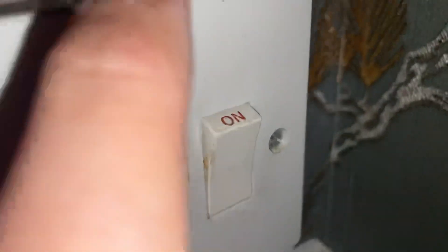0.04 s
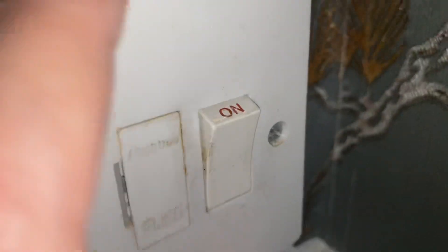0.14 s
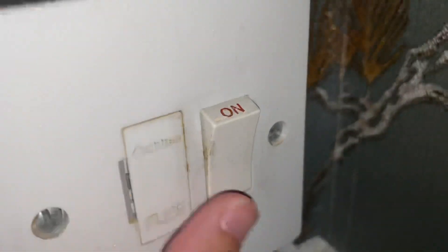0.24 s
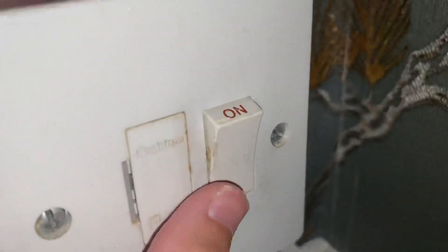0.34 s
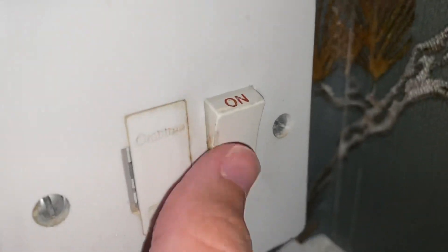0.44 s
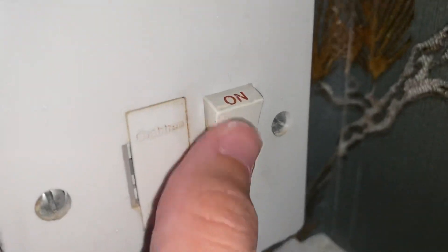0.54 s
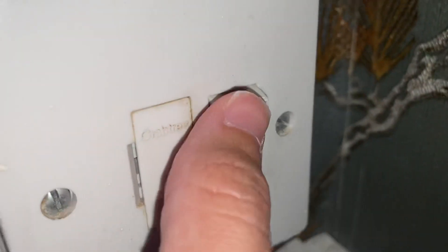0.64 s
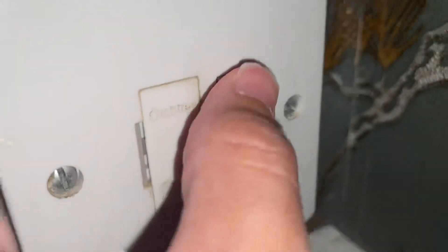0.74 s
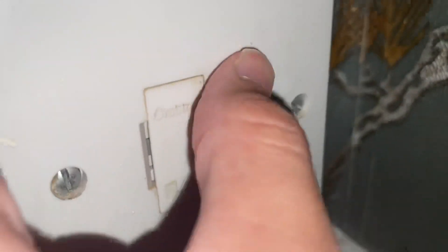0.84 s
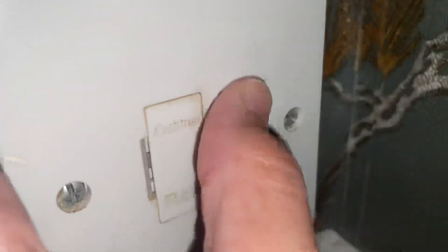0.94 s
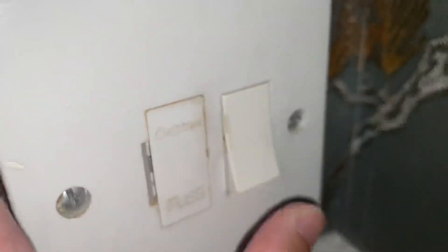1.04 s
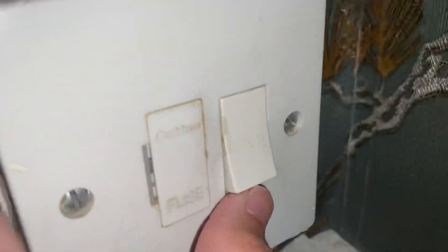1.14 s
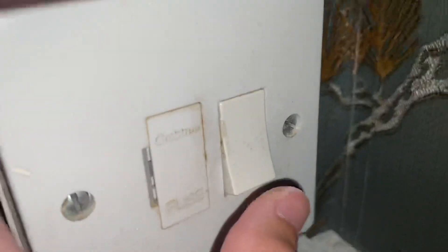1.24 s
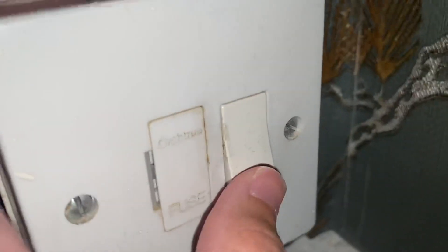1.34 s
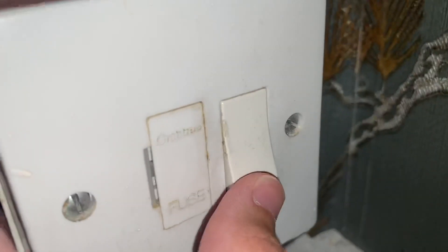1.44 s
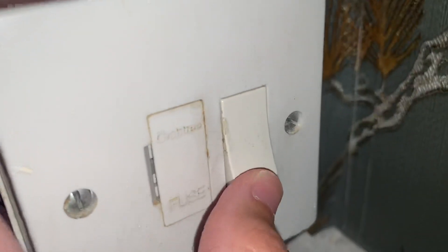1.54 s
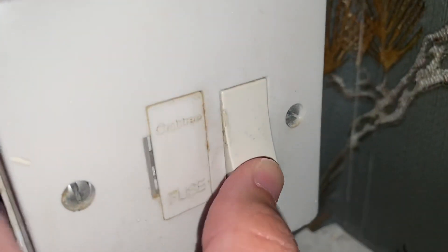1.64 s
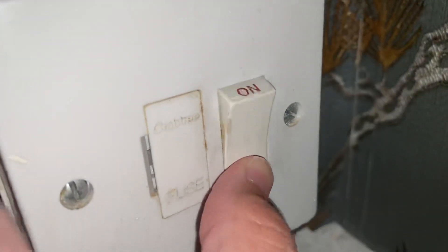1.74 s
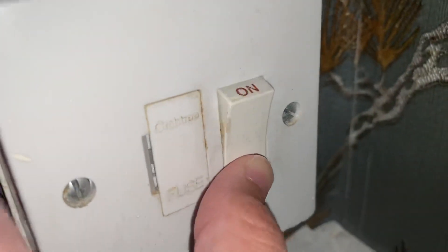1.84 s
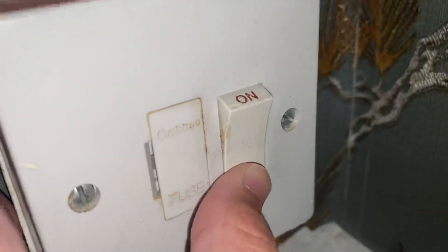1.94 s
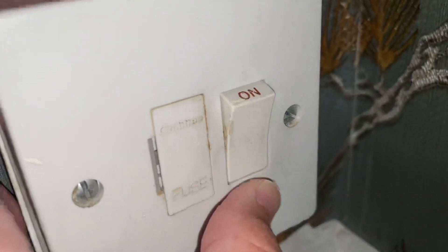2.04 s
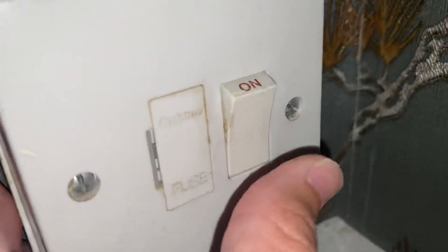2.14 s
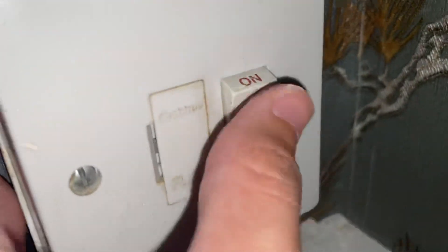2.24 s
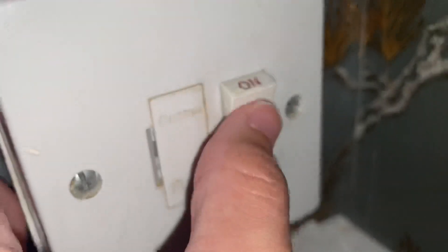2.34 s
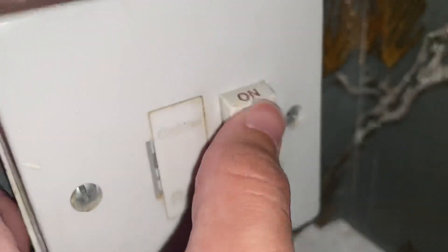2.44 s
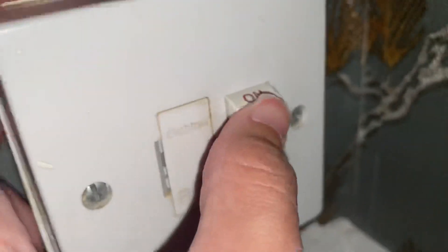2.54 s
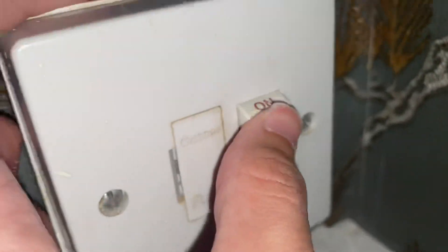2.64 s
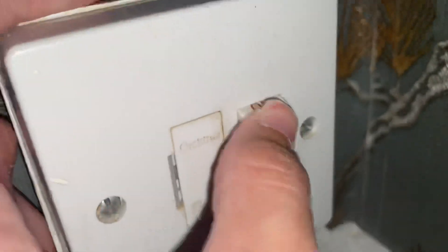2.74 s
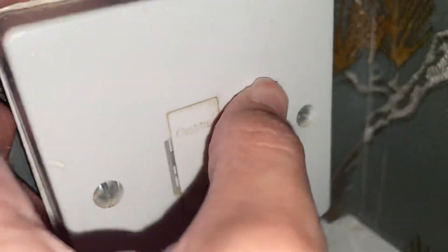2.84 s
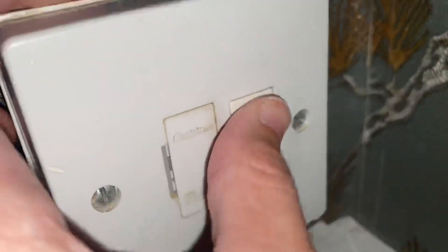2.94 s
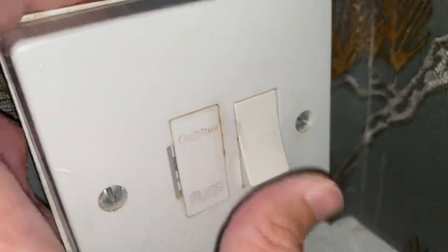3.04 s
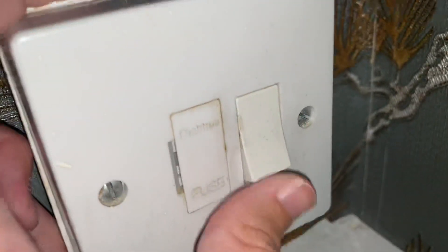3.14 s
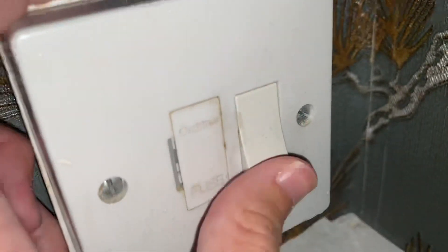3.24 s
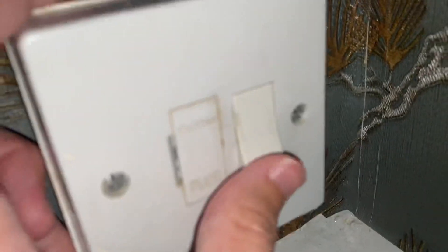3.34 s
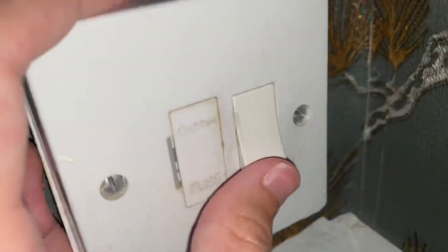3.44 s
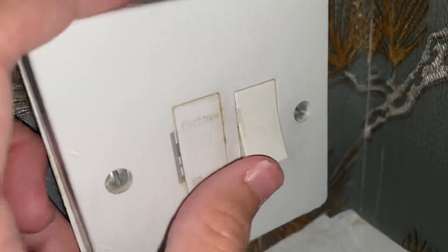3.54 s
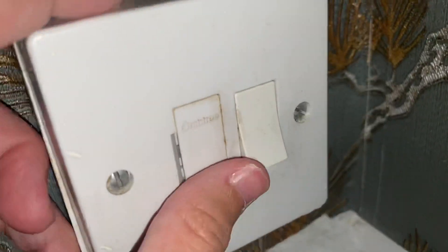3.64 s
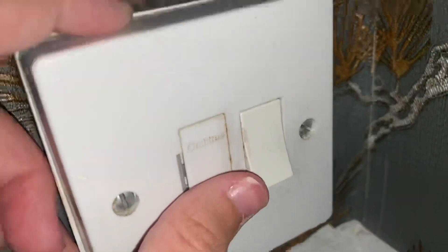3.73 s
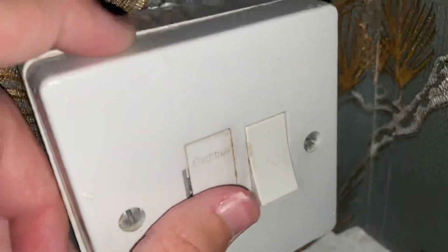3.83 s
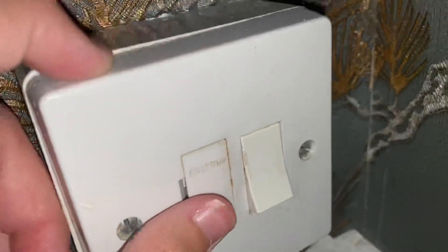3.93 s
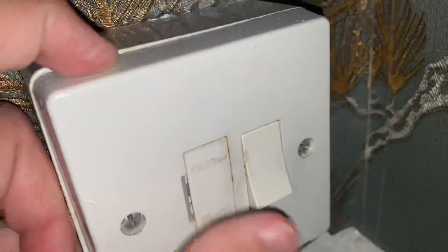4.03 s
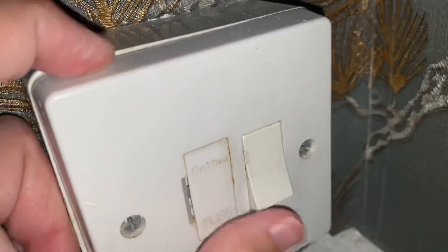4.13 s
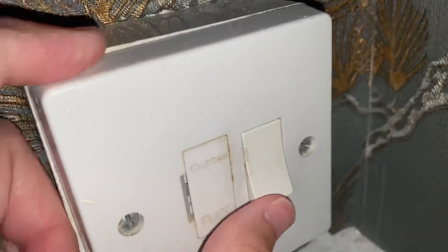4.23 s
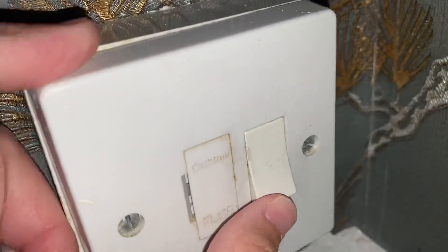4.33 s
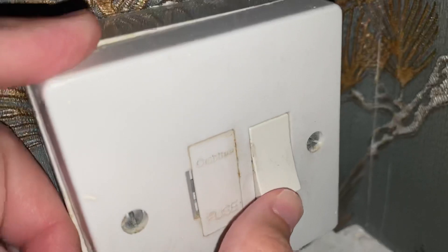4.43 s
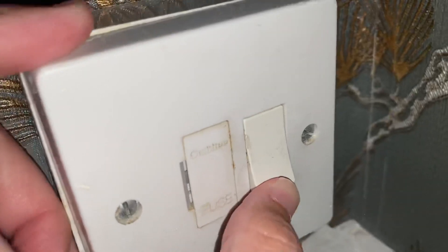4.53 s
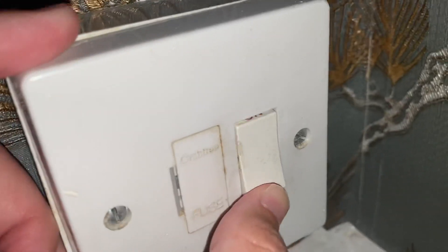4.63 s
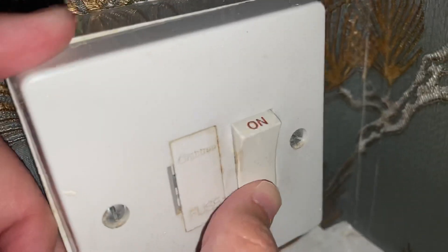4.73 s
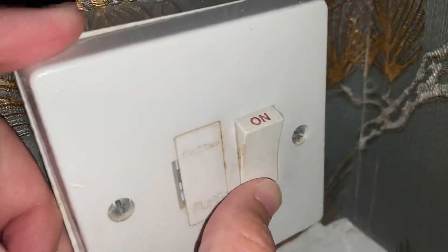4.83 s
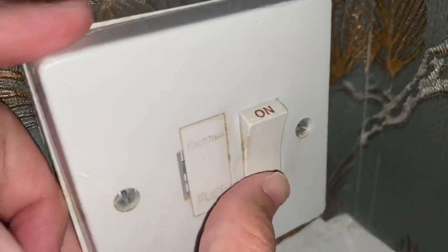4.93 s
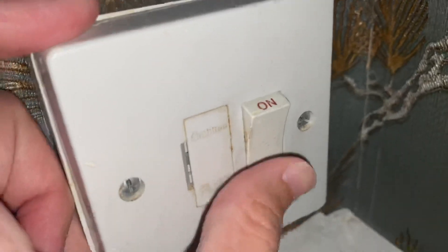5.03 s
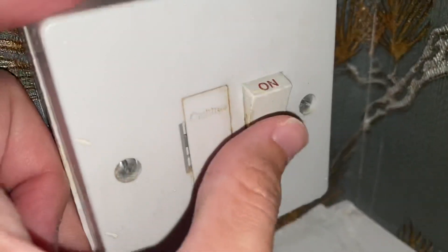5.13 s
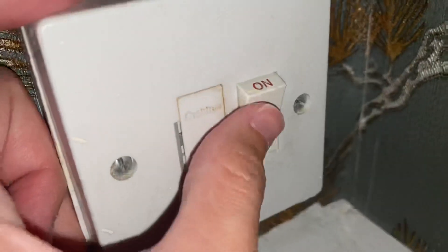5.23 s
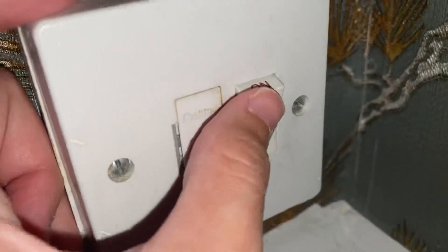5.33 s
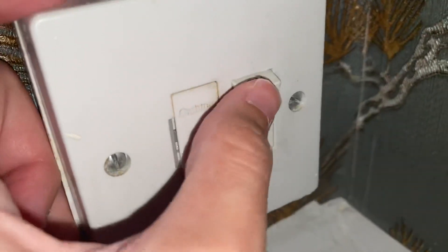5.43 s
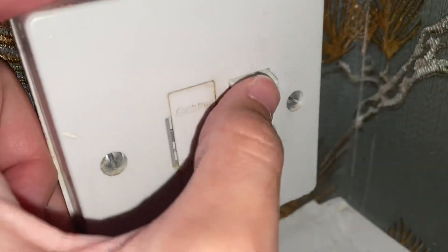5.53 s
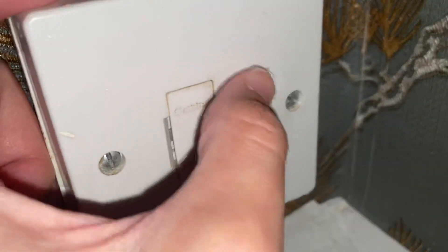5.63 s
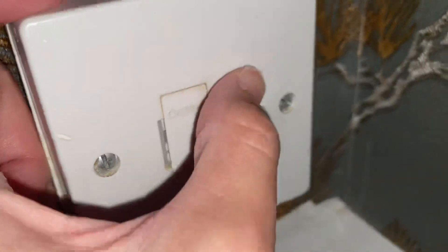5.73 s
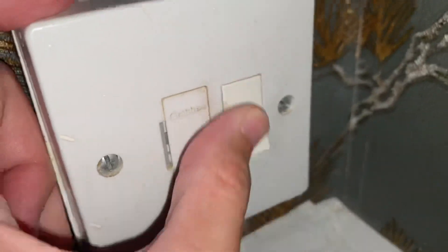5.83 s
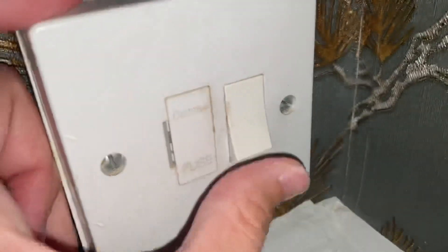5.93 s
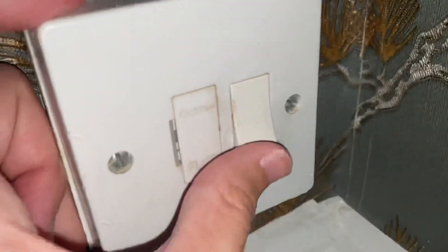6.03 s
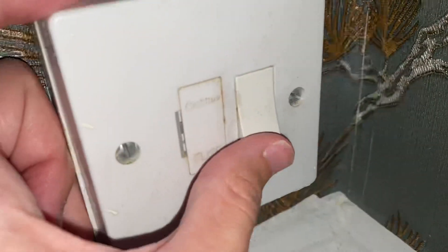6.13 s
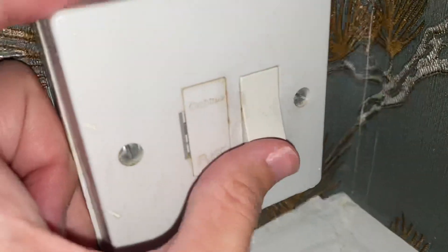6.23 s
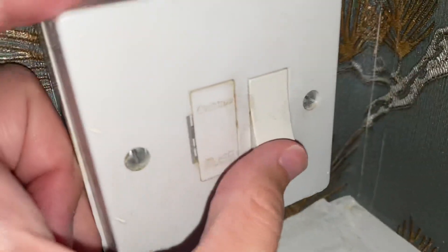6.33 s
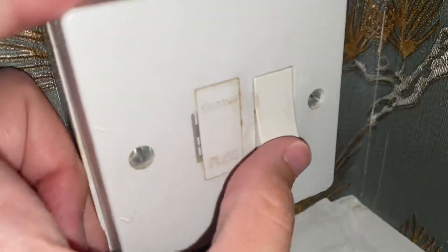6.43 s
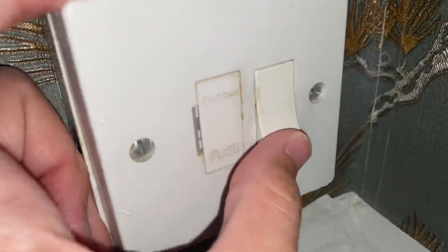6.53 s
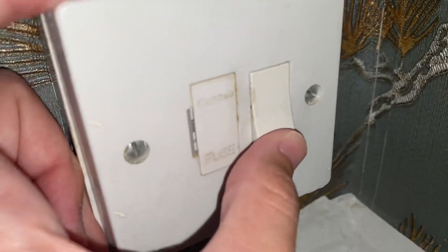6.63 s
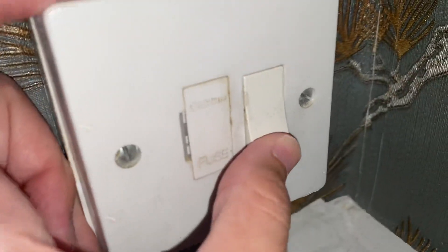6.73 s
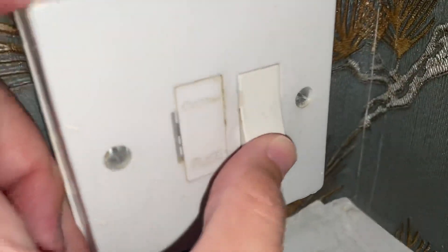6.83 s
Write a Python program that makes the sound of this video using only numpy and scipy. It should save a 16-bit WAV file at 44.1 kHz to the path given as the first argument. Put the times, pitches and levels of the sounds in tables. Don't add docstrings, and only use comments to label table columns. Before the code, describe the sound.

Five hard, bright plastic switch snaps, unevenly spaced over seven seconds, very close, with finger rustles, small ticks and faint hum in a room.

```python
import sys
import numpy as np
from scipy import signal
from scipy.fft import rfft, irfft, next_fast_len
from scipy.io import wavfile
from scipy.ndimage import uniform_filter1d, map_coordinates

SR = 44100
rng = np.random.default_rng(int(sys.argv[2]) if len(sys.argv) > 2 else 0)


def boost_factor(decibels):
    exponent = np.asarray(decibels, float) / 20
    return 10 ** exponent


def int16_out(signal):
    q = np.round(np.clip(np.atleast_2d(signal).T, -1, 1) * 32767)
    wavfile.write(sys.argv[1], SR, q.astype(np.int16))


N = 302967
TIME_S = np.arange(N) / SR


def unit(x):
    return x / np.sqrt(np.mean(x ** 2) + 1e-20)


def along(points, hz):
    f, v = np.transpose(points)
    return np.interp(np.log(hz + 1), np.log(f + 1), v)


def curve(points):
    s, v = np.transpose(points)
    return np.interp(TIME_S, s, v)


def wobble(rate_hz):
    knots = rng.standard_normal(int(N * rate_hz / SR) + 4)
    return map_coordinates(knots, [np.arange(N) * rate_hz / SR])


def filtered(x, response):
    n = x.shape[-1]
    m = next_fast_len(n + 8192)
    return irfft(rfft(x, m) * response(np.fft.rfftfreq(m, 1 / SR)), m)[..., :n]


def modes(table):
    def response(f):
        total = 0
        for k, (c, w, db) in enumerate(table):
            total = total + (-1) ** k * boost_factor(db) * 1j * f * w / (c * c - f * f + 1j * f * w)
        return total
    return response


# f/Hz, correlation
LIKENESS = [(60, 1), (130, 0.77), (290, 0.93), (640, -0.32), (1400, -0.069), (4000, 0.28), (6000, .2)]


def rush(gain, patchy_db, alike=LIKENESS):
    z = signal.stft(rng.standard_normal((2, N)), nperseg=1024)[2]
    field = uniform_filter1d(rng.standard_normal(z.shape[1:]), size=4, axis=0)
    field = uniform_filter1d(field, size=12, axis=1)
    pair = signal.istft(z * boost_factor(patchy_db * unit(field)), nperseg=1024)[1][:, :N]

    def mid_side_gain(hz):
        angle = np.arccos(np.clip(along(alike, hz), -1, 1)) / 2
        return gain(hz) * np.array([np.cos(angle), np.sin(angle)])
    mid, side = filtered(pair, mid_side_gain)
    return unit(np.array([mid + side, mid - side]))


# f/Hz, density/dB per Hz
AIR_SPECTRUM = [(65, -26.5), (110, -1), (147, -19), (248, -23.5), (318, -20.5), (361, -21.5), (780, -30.5),
                (1000, -21.5), (1430, -27.5), (1990, -24.5), (3100, -38), (7250, -57.5), (8740, -63),
                (11000, -58.5), (16000, -75)]


def room_air():
    level_db = -67 + 0.33 * wobble(1.7) + 0.87 * wobble(33)
    return boost_factor(level_db) * rush(lambda f: boost_factor(along(AIR_SPECTRUM, f)), patchy_db=2.5)


# f/Hz, width/Hz, level/dB
HUM_MODES = [(90.57, 17, -0.5), (172.9, 30, -18)]
# t/s, level/dB
HUM_LEVEL = [(0, -60), (.55, -59.5), (.684, -76), (.82, -55), (1.2, -61), (1.7, -59), (2.0, -63),
             (2.42, -69), (2.7, -64), (2.93, -74.5), (3.286, -60.5), (3.66, -65.5), (4.0, -63.5),
             (4.76, -59.5), (5.3, -67), (5.5, -62.5), (5.9, -66), (6.264, -61)]


def mains_hum():
    phase = 2 * np.pi * 99.7 * TIME_S + .8 * wobble(9)
    line = np.sin(phase) + boost_factor(-18.0 + 0.97 * wobble(1.3)) * np.sin(3 * phase)
    buzz = rush(lambda f: modes(HUM_MODES)(f) * (f > 60), patchy_db=-1.26)
    return boost_factor(curve(HUM_LEVEL) + 5.0) * unit(buzz + 2.5 * line)


# f/Hz, width/Hz, level/dB
FAR_BANDS = [(381.1, 100, -80.5), (546, 81, -82.5), (1090, 410, -76), (1916, 280, -83.5), (3730, 600, -89)]
# t/s, length/s, f/Hz, level/dB
FAR_SWELLS = [
    (2.68, 0.082, 413, -68),
    (4.15, 0.11, 943, -67.5),
    (4.55, 0.16, 393.3, -71),
    (5.25, .1, 3410, -80),
    (5.305, 0.056, 1090, -70),
    (5.453, 0.11, 370.3, -73.5),
    (5.996, 0.17, 371.4, -70),
    (6.099, 0.19, 2985, -88),
    (6.584, 0.096, 396, -68.5),
]


def appliance():
    noise = rng.standard_normal((2, N))

    def band(hz, width_hz):
        return unit(filtered(noise, lambda f: modes([(hz, width_hz, 0)])(f) ** 2))
    out = np.zeros((2, N))
    for hz, width_hz, db in FAR_BANDS:
        out += boost_factor(db + 0.72 * wobble(3.3)) * band(hz, width_hz)
    for s, length_s, hz, db in FAR_SWELLS:
        out += boost_factor(db) * np.exp(-((TIME_S - s) / length_s) ** 2) * band(hz, 0.073 * hz)
    return out


# t/s, level/dB
TREMOR = [(0, -61.5), (.5, -49.5), (.582, -43.5), (.726, -38.5), (.88, -44.5), (.955, -62.5),
          (1.126, -60.5), (1.7, -64), (1.9, -65), (2.45, -74), (3.04, -77), (3.286, -54), (3.55, -60),
          (3.68, -81.5), (4.0, -73), (5.03, -61), (5.3, -76.5), (6.87, -70.5)]
# t/s, level/dB
GRIP_PRESSURE = [(0, -57), (.1, -68), (.45, -59.5), (.58, -43), (.66, -55), (.8, -57), (.95, -64.5),
                 (1.2, -63.5), (2.4, -71), (2.77, -66), (3.3, -76), (6.87, -72.5)]


def hand_on_phone():
    rumble = rush(lambda f: modes([(40, 35, 0)])(f) ** 2, patchy_db=.5, alike=[(40, .55)])
    grip = rush(lambda f: modes([(150, 150, 0)])(f) ** 3, patchy_db=3.0, alike=[(150, 0.83)])
    rumble_db = curve(TREMOR) + 1.2 * wobble(9.2)
    grip_db = curve(GRIP_PRESSURE) + 2.5 * wobble(8) + 4.5
    return boost_factor(rumble_db) * rumble + boost_factor(grip_db) * grip


# t/s, f/Hz, peak level/dB, half length/s
GRIP_BUMPS = [
    (0.564, 36.2, -23.5, 0.01),
    (0.609, 37.6, -31, 0.044),
    (0.662, 70, -44, 0.027),
    (0.726, 113.8, -24.5, 0.0081),
    (0.776, 44.95, -37.5, .04),
    (5.048, 55, -46, 0.013),
]


def bumps():
    push = np.zeros(N)
    for s, hz, db, half_s in GRIP_BUMPS:
        t = TIME_S - s
        push += boost_factor(db) * np.exp(-(t / half_s) ** 2) * np.sin(2 * np.pi * hz * t)
    return push * np.c_[[.6, 1.3]]


# t/s, level/dB
PALM_LEVEL = [
    (0.0, -49),
    (0.022, -45.5),
    (0.096, -76),
    (0.196, -72.5),
    (0.4, -54),
    (0.518, -68),
    (0.544, -80),
    (0.62, -90),
]


def palm():
    rustle = rush(lambda f: modes([(440, 170, 0)])(f) ** 2, patchy_db=3.5)
    return boost_factor(curve(PALM_LEVEL + [(.7, -110)]) - 2.0) * rustle


# t/s, fade/s, hiss level/dB, drag level/dB
STROKES = [(.0, 0.043, -49.5, -50.5), (0.203, 0.036, -60, -82), (0.358, 0.14, -66, -65.5),
           (.568, 0.059, -60.5, -66), (0.678, 0.027, -69.5, -67), (0.791, 0.092, -85, -62.5),
           (1.018, 0.051, -50, -55), (1.12, .06, -71, -63.5), (1.3, 0.18, -93, -79.5),
           (2.033, 0.015, -63, -77), (2.55, 0.093, -79, -69), (2.76, .03, -63, -60),
           (3.049, 0.11, -61, -73.5), (3.183, 0.031, -78, -81.5), (3.282, 0.069, -71.5, -72),
           (3.385, 0.026, -87, -74), (3.532, 0.072, -82.5, -65.5), (3.621, 0.08, -68.5, -85),
           (3.76, 0.087, -67.5, -67.5), (3.858, .12, -63.5, -72), (4.041, .07, -68, -73.5),
           (4.14, .04, -77.5, -65.5), (4.64, .05, -75, -82), (4.975, 0.014, -80.5, -66),
           (5.289, 0.031, -74, -79), (5.885, .05, -58.5, -77), (6.192, .045, -80, -88),
           (6.422, .055, -79, -81), (6.736, .018, -85, -74), (6.805, .045, -86, -89.5)]
# f/Hz, density/dB per Hz
SKIN_SPECTRUM = [(1500, -24.5), (2500, -4), (4000, -3.5), (7000, -5.5), (9000, -4.5), (11000, -10),
                 (13000, -10), (15600, -12), (16000, -46)]
# f/Hz, width/Hz, level/dB
HOLLOW_MODES = [(610, 97, 1.5), (828, 14, -9)]
LANDINGS_S = [
    .8495,
    1.7475,
    2.801,
    4.690,
    5.656,
]


def fingers():
    coarse_s = TIME_S[::64, None]
    s, fade_s, hiss_db, drag_db = np.transpose(STROKES)
    stroke = boost_factor(-28 * (np.abs(coarse_s - s) / fade_s) ** 1.4)
    late_s = coarse_s - np.array(LANDINGS_S) - 0.13
    slide = np.clip(late_s / .03 + 1, 0, 1) * boost_factor(-68.5 * np.abs(late_s))
    touching = slide * np.clip((0.14 - late_s) / .025, 0, 1)

    def effort(stroke_db, sliding, slide_db, rest_db):
        total = stroke @ boost_factor(stroke_db) + boost_factor(slide_db) * sliding.sum(axis=1) + boost_factor(rest_db)
        return np.interp(TIME_S, TIME_S[::64], total)
    grain = boost_factor(2.2 * wobble(190) + 1.2 * wobble(35))
    hiss = unit(grain * rush(lambda f: boost_factor(along(SKIN_SPECTRUM, f)), patchy_db=-3.5))
    drag = unit(grain * rush(modes(HOLLOW_MODES + [(1130, 280, 1.0)]), patchy_db=1.5))
    return effort(hiss_db, touching, -65, -99) * hiss + effort(drag_db, slide, -64, -86) * drag


LEAD = 1536
T = (np.arange(6 * LEAD) - LEAD) / SR


def burst(t60_s, rise_s, alike, early_db=-90):
    early = np.minimum(T, 0)
    before = np.exp(early / np.c_[rise_s]) + boost_factor(early_db) * np.exp(early / .012) * np.c_[[.1, 1]]
    after = boost_factor(-60 * np.maximum(T, 0) / t60_s)
    a, b = rng.standard_normal((2, len(T)))
    pair = np.array([a, alike * a + np.sqrt(abs(1 - alike ** 2)) * b])
    return np.where(T < 0, before, after) * pair


def peaked(x, db):
    return boost_factor(db) * x / np.abs(x).max()


def add(into, s, x):
    into[:, round(s * SR):][:, :len(T)] += x


# f/Hz, width/Hz, level/dB
PLATE_MODES = [(1910, 760, -0.5), (2430, 120, -9), (3270, 250, -10), (4060, 480, -3.5)]


def contacts(rows):
    out = np.zeros((2, N + SR))
    for s, db, top_db, plate_db, knock_db, t60_s in rows:
        def colour(f):
            treble = along([(6500, 0.11), (10000, 1.0)], f)
            return boost_factor(along(SKIN_SPECTRUM, f) + (top_db + 6.5) * treble)
        crack = filtered(burst(t60_s, [.0002, .0004], 0.12), colour)
        plate = filtered(burst(t60_s, [.0004, .001], 0.13), modes(PLATE_MODES))
        knock = filtered(burst(0.045 * t60_s, [.0006, .0006], 0.39), modes(HOLLOW_MODES))
        add(out, s, peaked(crack, db + 0.5))
        add(out, s, peaked(plate, db + plate_db + 3.5))
        add(out, s, peaked(knock, db + knock_db + 10.0))
    return out[:, LEAD:N + LEAD]


# t/s, crack peak level/dB, top octave/dB, plate/dB
TICK_EVENTS = [(0.1306, -42, 4.5, -40), (0.2044, -41.5, 3, -33), (0.2694, -54.5, -3, -12),
               (0.2867, -54, 5, -21), (1.1717, -50, -24, -6.5), (2.0238, -40.5, -9, -7),
               (2.5346, -53, -21, -16), (2.7457, -53, -33.5, -7), (4.0144, -57, -9.5, -12),
               (4.1405, -52.5, -30, -8), (4.9394, -67, 2.5, -8), (5.2844, -62.5, -15, 0.5),
               (6.1894, -63.5, -16.5, -1), (6.7240, -47, -22, -1.5), (6.8004, -54.5, -10, -19)]


def ticks():
    return contacts([(s, db, top_db, plate_db, -20, .017) for s, db, top_db, plate_db in TICK_EVENTS])


# t/s, crack peak level/dB,
# plate/dB, hollow knock/dB
TAP_EVENTS = [(0.012, -47, 10, 4), (0.7724, -70, 2, -3), (0.7874, -69, 10, -5), (2.5576, -52.5, -18, -5.5),
              (2.7705, -34, 4.5, -4.5), (3.2494, -70, 0.5, 10), (3.3662, -55.5, -9.5, -7),
              (3.5314, -57, -6.5, 1), (3.7844, -53, 2, -3), (4.2644, -72.5, 6.5, 8.5),
              (4.9633, -44, -9, -7.5)]


def taps():
    return contacts([(s, db, -6, plate_db, knock_db, .022) for s, db, plate_db, knock_db in TAP_EVENTS])


# t/s, crack peak level/dB, t60/s
SLIP_EVENTS = [
    (0.817, -42, 0.033),
    (0.831, -24, 0.014),
    (0.8397, -29, 0.012),
    (2.7914, -26.5, 0.035),
    (4.6593, -52, 0.046),
    (5.613, -53, 0.029),
    (5.634, -26, 0.011),
    (5.6469, -28, 0.085),
]


def spring_slips():
    return contacts([(s, db, -10.5, -0.46, -17.5, t60_s) for s, db, t60_s in SLIP_EVENTS])


# f/Hz, t60/s
ROOM_T60 = [(300, 0.93), (800, 0.36), (2100, 0.71), (5500, 0.37), (10000, 0.36), (14600, 0.25)]


def tail():
    hz, t, z = signal.stft(rng.standard_normal((2, SR // 2)), SR, nperseg=256)
    fall = boost_factor(-60 * t / along(ROOM_T60, hz)[:, None]) + 4.0 * boost_factor(-60 * t / 0.1)
    x = signal.istft(z * fall, SR, nperseg=256)[1]
    return x / np.linalg.norm(x[0])


# f/Hz, level/dB
WALL_COLOUR = [(200, -17.5), (500, -4.5), (1000, -3.5), (2000, -4.5), (3500, -5.5), (6000, -7), (9000, -15),
               (12000, -17), (15500, -20), (16200, -39.5)]
# gain duck/dB, room answer level/dB, favoured f/Hz
AFTERMATH = [
    (9.5, -26.5, 1800),
    (11.5, -26.5, 1400),
    (8.5, -25, 3000),
    (4.5, -29.5, 1900),
    (13.5, -22.5, 2800),
]


def room(small):
    out = np.zeros((2, N + SR))
    for s, (_, db, hz) in zip(LANDINGS_S, AFTERMATH):
        def colour(f):
            return boost_factor(along(WALL_COLOUR, f) + 7.6 * np.exp(-((f - hz) / 280) ** 2))
        answer = filtered(tail(), colour)
        n = answer.shape[1]
        answer *= np.clip(np.arange(n) / (0.0067 * SR), .05, 1)
        out[:, round((s + .010) * SR):][:, :n] += boost_factor(db + 35.5) * answer
    weak = signal.fftconvolve(np.pad(small, ((0, 0), (500, 0))), tail(), axes=1)
    return out[:, :N] + boost_factor(-9.5) * weak[:, :N]


# t/s, crack peak level/dB, top octave/dB, plate/dB, plate f/Hz
SNAP_EVENTS = [
    (0.8489, -1.5, 2.5, -7.5, 4060),
    (1.7470, 1, 5.5, -9.5, 3924),
    (2.8000, 0.5, 4, -6.5, 2440),
    (4.6884, -8, 5, -3.5, 2610),
    (4.6890, -2.5, 5, -8.5, 3840),
    (4.6912, -10, 4.5, 0.5, 2276),
    (5.6554, -1, 2, -4, 3030),
]
# f/Hz, density/dB per Hz
CRACK_SPECTRUM = [(500, -41.5), (900, -13.5), (2300, -9), (4600, -5), (5500, 1), (8000, -4.5), (11300, -8),
                  (14000, -9), (16500, -25)]
# f/Hz, width/Hz, level/dB
BOX_MODES = [(348.5, 39, 0.5), (540, 150, 0), (875, 190, -4.5)]
HELD_S = 2.5
BOX_DB, THUMP_DB = (-25.5, -31), (-20.5, -38.5)


def snaps():
    out = np.zeros((2, N + SR))
    for s, db, top_db, plate_db, hz in SNAP_EVENTS:
        held = int(s > HELD_S)
        body_hz = AFTERMATH[np.argmin(np.abs(np.array(LANDINGS_S) - s))][-1]

        def colour(f):
            return boost_factor(along(CRACK_SPECTRUM, f) + top_db * along([(5000, -1.0), (11000, 0.96)], f))
        crack = filtered(burst(0.012, [.00015, .0006], 0.33, early_db=-33), colour)
        edge = filtered(burst(0.022, [.0002, .0018], -0.36, early_db=-26.0),
                        modes(PLATE_MODES[1:] + [(hz, 400, 4)]))
        body = filtered(burst(0.02, [.0006, .0018], -0.3, early_db=-32.5),
                        modes(PLATE_MODES[:1] + [(body_hz, 300, 4)]))
        plate = peaked(edge, 0) + np.roll(peaked(body, -1), round(0.0018 * SR), axis=1)
        box = filtered(burst(0.0047, [.0006, .0012], 1.0), modes(BOX_MODES))
        u = np.maximum(T - np.c_[[.002, .0025]], 0)
        thump = np.sin(2 * np.pi * 110 * u) + 1.3 * np.sin(2 * np.pi * 185 * u)
        thump = thump * boost_factor(-60 * u / .06) * np.c_[[1, .6]]
        add(out, s, peaked(crack, db) + peaked(plate, db + plate_db))
        add(out, s, peaked(box, BOX_DB[held]) + peaked(thump, THUMP_DB[held]))
    return out[:, LEAD:N + LEAD]


def scene():
    background = room_air() + mains_hum() + appliance()
    handling = hand_on_phone() + bumps() + palm() + fingers()
    small = ticks() + taps() + spring_slips()
    return background + handling + small + room(small) + snaps()


def band_limit(x):
    return signal.sosfilt(signal.butter(12, 17090, fs=SR, output="sos"), x)


# f/Hz, width/Hz, level/dB
PORT_DIPS = [(9070, 380, -12), (13100, 540, -10)]


def record(dry):
    t = TIME_S - .008
    duck_db = np.zeros(N)
    for s, (db, *_) in zip(LANDINGS_S, AFTERMATH):
        duck_db += db * (t > s) * np.exp(-(np.maximum(t - s, 0) / 0.15) ** 2)
    x = dry * boost_factor(-uniform_filter1d(duck_db, size=200))
    x = x / (1 + np.abs(x) ** 8) ** (1 / 8)

    def high(f):
        return np.clip((f - 6100) / 600, 0, 1)

    def low_path(f):
        bass_cut = (f / 22) ** 4 / (1 + (f / 22) ** 4)
        return (1 - high(f)) * bass_cut

    def high_path(f):
        lag = np.exp(1j * np.pi * np.c_[[-1, 1]] * (f - 6850) / 4330)
        top_cut = np.clip((16900 - f) / 900, 0, 1) ** 2
        port_db = sum(db * np.exp(-((f - hz) / width_hz) ** 2) for hz, width_hz, db in PORT_DIPS)
        return high(f) * lag * top_cut * boost_factor(port_db)
    mix = filtered(x, low_path) + filtered(x[0], high_path)
    return band_limit(mix)


dry = scene()
out = record(dry)
int16_out(out)
```